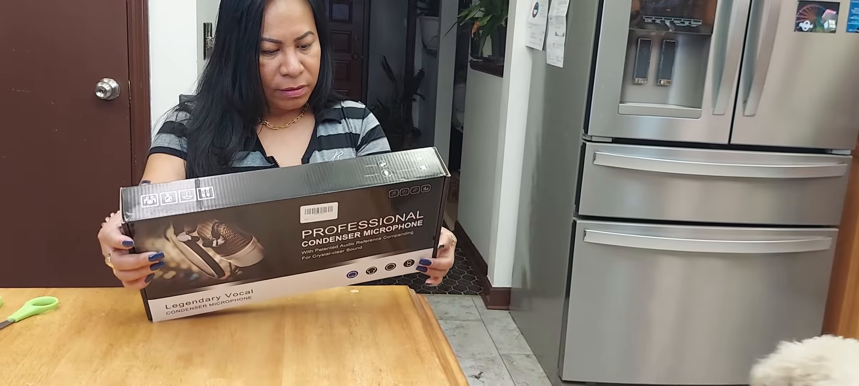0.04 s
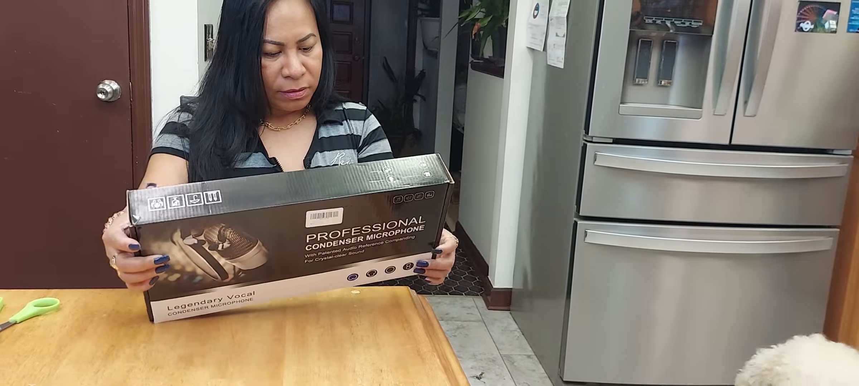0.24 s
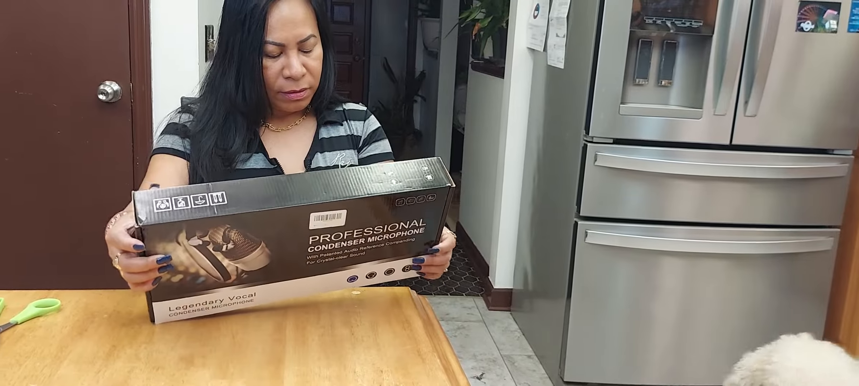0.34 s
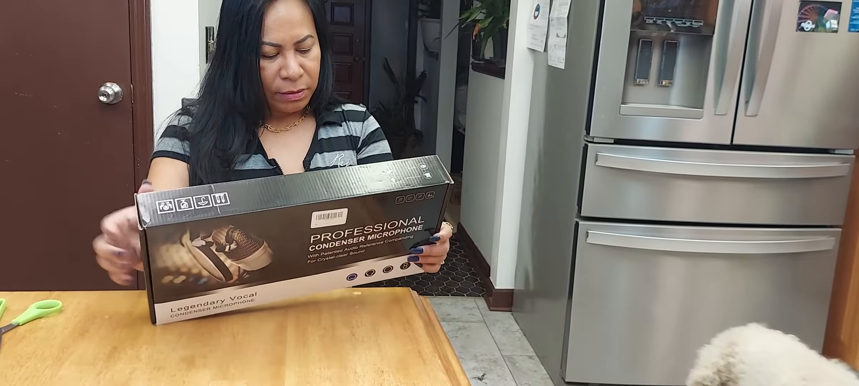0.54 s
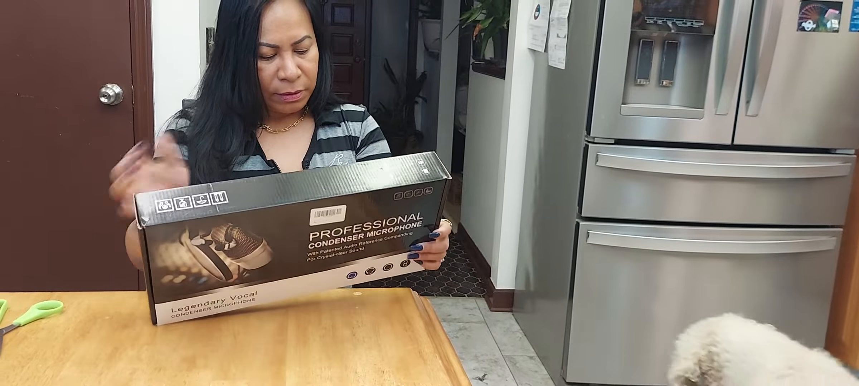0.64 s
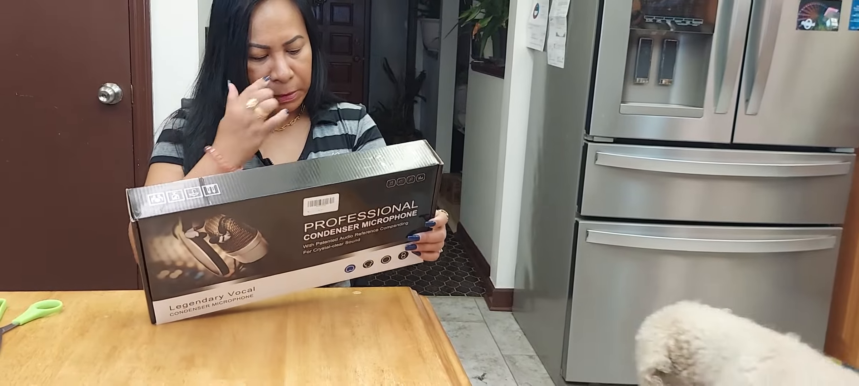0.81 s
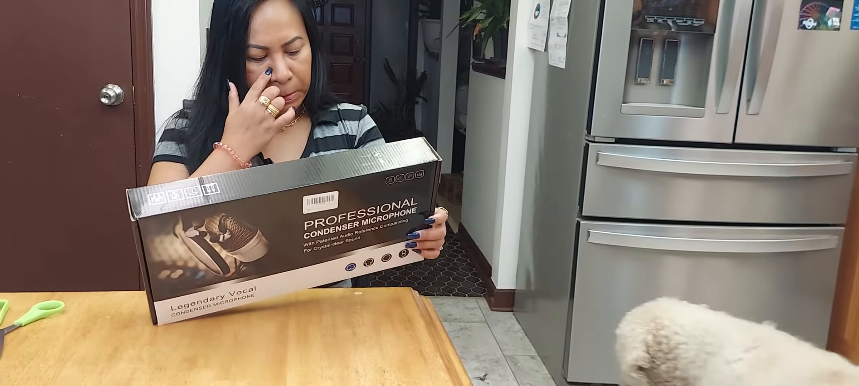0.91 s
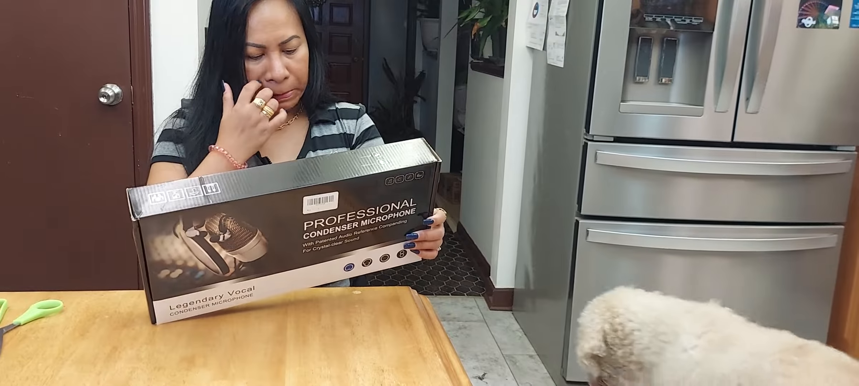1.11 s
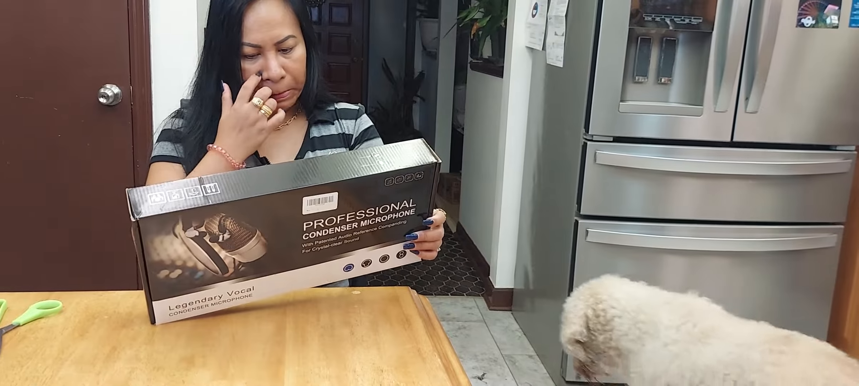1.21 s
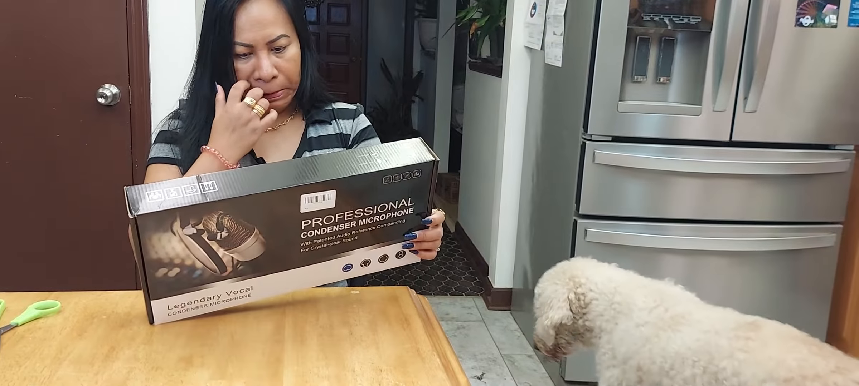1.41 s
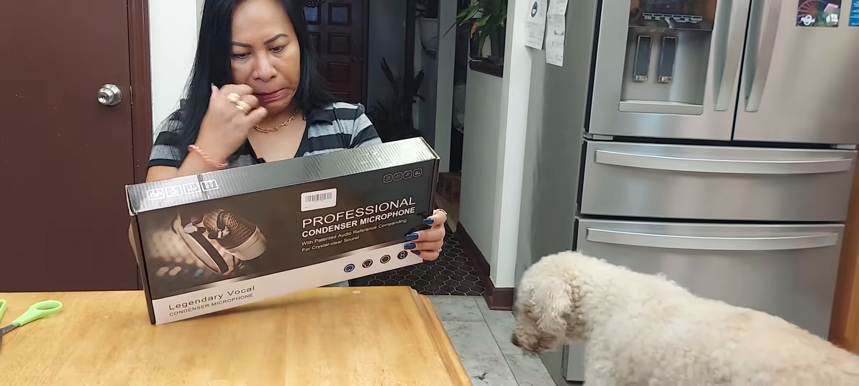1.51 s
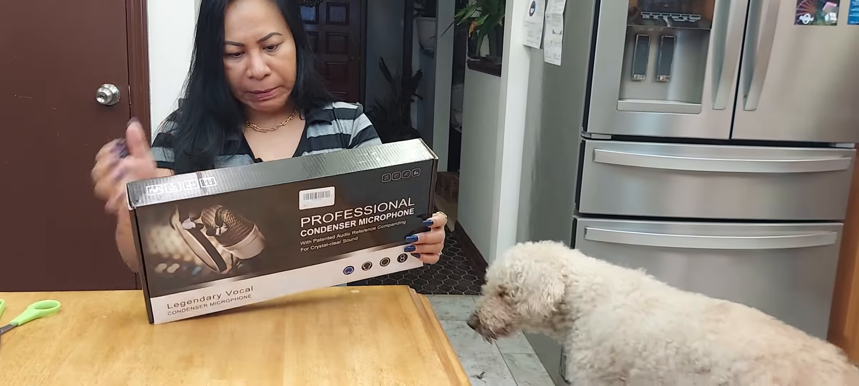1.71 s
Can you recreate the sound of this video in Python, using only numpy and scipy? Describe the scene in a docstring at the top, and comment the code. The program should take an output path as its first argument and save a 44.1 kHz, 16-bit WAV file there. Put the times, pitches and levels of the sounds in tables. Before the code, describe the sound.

Fingers knock, slide and click on a hollow cardboard box, which crackles briefly.

```python
"""A long cardboard box is handled at a kitchen table; low hum and faint hiss, the hard room rings.
0-0.5 s: a crackle's tail dies; fingertips knock, slide and squeak, nails click, the box rocks and thumps.
0.8-1.2 s: more squeaks and knocks on the hollow shell, a cluster of nail clicks, then a soft scuff.
1.4 s: the card gives way in one quick crackle of creases that ring its panels.
1.6-1.75 s: a last squeak, two knocks, a faint click and a slide as the grip shifts."""
import sys
import numpy as np
from scipy import signal
from scipy.fft import rfft, irfft, next_fast_len
from scipy.io import wavfile
from scipy.ndimage import map_coordinates

SR = 44100
rng = np.random.default_rng(int(sys.argv[2]) if len(sys.argv) > 2 else 0)


def generate_wav(signal):
    """Clip the signal to [-1, 1] and save it as 16-bit WAV at the path in sys.argv[1]."""
    frames = np.transpose(np.atleast_2d(signal))
    scaled = np.clip(frames, -1, 1) * 32767
    pcm = np.round(scaled).astype(np.int16)
    wavfile.write(sys.argv[1], SR, pcm)


N = 77175
T = np.arange(N) / SR

# room decay: f/Hz, T60/s
ROOM_DECAY = [(100, 0.3), (500, 0.32), (1600, 0.37), (4000, 0.42), (8000, 0.32), (14000, 0.35)]
# diffuse field: f/Hz, left-right correlation/1
COHERENCE = [(60, 0.88), (200, 0.51), (600, 0.7), (1000, 0.071), (16000, 0)]
# room colour, shading of the left channel, resonance of the right: f/Hz, gain/dB
ROOM_EQ = [(100, 4), (1500, 1.5), (4000, 5), (8200, 1), (9200, -7), (13000, -9.5), (16000, -5)]
LEFT_EQ = [(200, -1.5), (8000, -5.5), (11000, -8.5), (13500, -3), (16000, -14.5)]
RIGHT_EQ = [(100, -3), (500, -0.5), (3000, -1.5), (8000, 0.5), (11000, 5), (13500, 9), (16000, 7)]
# spectra: f/Hz, level/dB
BACKGROUND_SPECTRUM = [(20, -16.5), (45, -1), (72, 11.5), (120, 3), (220, -6.5), (450, -2.5), (700, -25),
                       (1330, -18.5), (1515, -1), (1760, -16), (6000, -29), (7800, -19), (9500, -29),
                       (15000, -24.5)]
GRIP_SPECTRUM = [(50, -20), (150, -5.5), (350, -1.5), (520, 1.5), (720, -4.5), (1000, -20.5), (1500, -11.5),
                 (2300, -32), (16000, -43.5)]
SLIDE_SPECTRUM = [(200, -12.5), (1500, 1.5), (3000, -7.5), (8000, -1.5), (10000, -7), (15500, 1)]
SCUFF_SPECTRUM = [(200, -2), (800, -2.5), (1100, -8), (1600, 7), (3000, -1.5), (5000, -8.5), (8000, -13),
                  (10000, -27), (16000, -17)]
SHELL_SPECTRUM = [(50, -25), (150, -10), (300, 1), (640, 0.5), (800, -3), (1050, -9), (1500, 2.5),
                  (2200, -23.5), (16000, -50)]
CARD_SPECTRUM = [(60, -39.5), (300, -19), (760, -13), (1250, -10), (1600, -1.5), (3000, -6.5), (5000, -6),
                 (7600, 0.5), (9500, -1), (12500, -3.5), (16000, -15.5)]
NAIL_SPECTRUM = [(60, -39), (250, -20), (700, -11), (1000, -9.5), (1600, 1), (2800, -7.5), (5000, -4.5),
                 (7800, 2), (9500, -1), (13000, -0.5), (16000, -9.5)]
# palms pressing on the shell: t/s, level/dB
GRIP_LEVELS = [(0, -65), (.1, -59), (.18, -61.5), (.3, -54.5), (.43, -66), (.52, -66), (.6, -71),
               (1.1, -75), (1.22, -76), (1.33, -79.5), (1.62, -81), (1.75, -57.5)]
# skin sliding on glossy print, fingers scuffing card: peak t/s, level/dB, rise/s, fall/s
SKIN_SLIDES = [(.215, -60, 0.036, 0.057), (.492, -55, 0.071, 0.043), (1.19, -70.5, .08, 0.094),
               (1.75, -58.5, 0.017, 0.033)]
CARD_SCUFFS = [(1.17, -62, 0.042, 0.045), (1.745, -64.5, 0.011, 0.056)]
# fingertip stick-slip: t/s, level/dB, rise/s, f/Hz
FINGER_SQUEAKS = [(.478, -63, .012, 650), (.786, -69.5, .016, 930), (.79, -69, .011, 725),
                  (1.16, -73, .036, 410), (1.635, -61.5, .004, 1400)]
# box rocking in the grip: t/s, level/dB
BOX_THUMPS = [(0.238, -53.5), (.266, -48)]
# lowest box modes: f/Hz, gain/dB, T60/s
BOX_MODES = [(79.4, -4.5, 0.28), (200.3, 6, 0.14)]
# fingertip knocks: t/s, level/dB, brightness/dB, spot f/Hz
FINGER_KNOCKS = [(0.096, -15.5, -21, 380), (.209, -16, -6.5, 505), (.236, -11, 2, 509),
                 (.362, -12, -6.5, 448), (.482, -18.5, -2.5, 648), (0.822, -23.5, -8, 529),
                 (.851, -22, 3.5, 328), (1.636, -30, 2.5, 1380), (1.710, -22, -12, 450)]
# card panel resonances: f/Hz, width/Hz, lift/dB
PANEL_MODES = [(770, 27, 9.5), (1105, 25, 11.5), (1894, 22, 7.5), (2420, 32, 5.5), (2954, 23, 9)]
# creases: t/s, level/dB re SNAP_DB, top/dB, middle/dB
CARD_CREASES = [(1.4073, -14.5, 1.5, 3.5), (1.4107, -15, 3, 0.5), (1.415, -9, -13.5, -4),
                (1.4178, -10, -14, 2.5), (1.4221, -15, -7, 11.5), (1.4300, -12, -15, -4.5)]
# crackle still ringing at the start: lead t/s, level/dB re SNAP_DB, top/dB, middle/dB
OPENING_CRACKLE = (.05, -6, -8, 10)
# fingernail clicks; the one at 0.882 s is a wall echo of the click just before:
# t/s, level/dB re SNAP_DB, top/dB, middle/dB, room/dB
CLICKS_AND_ECHO = [(0.2315, -2, 8.5, -7, 3), (0.235, 0.5, 7, -2, -0.5), (.2370, -2, -2.5, -0.5, 6.5),
                   (0.8674, -37, 11, -10, 11), (0.8756, -7, -1.5, -6, 7.5), (0.8773, -5.5, 1.5, -3.5, 6),
                   (0.882, -12, -10, -9, 0), (0.9415, -1.5, -1.5, -5, -1.5), (1.0068, -21, -9, 7, 0.5),
                   (1.7114, -34, -7, 15.5, -2.5)]

ROOM_BUILD_S, WALL_S, WALL_DB = 0.0024, 0.008, -13
LEFT_DELAY_S, CUTOFF_HZ = 0.00015, 15800
BACKGROUND_DB, GRAIN_DB = -69, 1.5
SQUEAK_SAG_PER_S, SQUEAK_ROUGHNESS, SQUEAK_ROOM_DB = 0.69, 0.65, -10
THUMP_ATTACK_S = 0.0056
KNOCK_T60_S, KNOCK_ROOM_DB, SPOT_DB, SPOT_Q = 0.022, 1, 8, 12
SNAP_DB, SNAP_SIGMA_S, CREASE_ROOM_DB = -6, 0.00028, 9


def amp(db):
    """dB to gain."""
    return 10 ** (np.asarray(db) / 20)


def unit_rms(x):
    """Scale to rms 1."""
    return x / np.sqrt(np.mean(x ** 2) + 1e-20)


def along(points, hz):
    """Interpolate (f/Hz, value) points on a log axis."""
    f, v = np.transpose(points)
    return np.interp(np.log(hz + 1), np.log(f + 1), v)


def eq(points):
    """(f/Hz, gain/dB) points to a frequency response."""
    return lambda hz: amp(along(points, hz))


def filtered(x, response):
    """Apply response(hz) by FFT."""
    size = next_fast_len(x.shape[-1] + SR // 4)
    return irfft(rfft(x, size) * response(np.fft.rfftfreq(size, 1 / SR)), size)[..., :x.shape[-1]]


def add(out, at_s, x):
    """Mix x into out from at_s."""
    i = int(round(at_s * SR))
    x = x[:, max(-i, 0):N - i]
    out[:, max(i, 0):max(i, 0) + x.shape[1]] += x


def wobble(knots_per_s):
    """Smooth random curve."""
    return map_coordinates(rng.standard_normal(2048), [T * knots_per_s], mode="wrap")


def burst(envelope):
    """Short random impulse, flat spectrum."""
    spectrum = rfft(rng.standard_normal(len(envelope)) * envelope)
    return irfft(spectrum / (abs(spectrum) + 1e-9))


def diffuse(size):
    """Stereo white noise, correlated in the bass only."""
    def mid_side_gains(hz):
        angle = np.arccos(along(COHERENCE, hz)) / 2
        return np.array([np.cos(angle), np.sin(angle)])
    mid, side = filtered(rng.standard_normal((2, size)), mid_side_gains)
    return np.array([mid + side, mid - side])


def noise(spectrum):
    """Coloured stereo noise, rms 1."""
    return unit_rms(filtered(diffuse(N), eq(spectrum)))


def room(t60_scale=1):
    """Fresh room tail; each frequency decays at its own rate."""
    hz, t, bins = signal.stft(diffuse(SR * 3 // 4), SR, nperseg=256)
    t60_s = t60_scale * along(ROOM_DECAY, hz)[:, None]
    tail = signal.istft(bins * amp(-60 * t / t60_s), SR, nperseg=256)[1]
    tail *= 1 - np.exp(-T[:tail.shape[1]] / ROOM_BUILD_S)
    return filtered(tail / np.linalg.norm(tail[0]), eq(ROOM_EQ))


def contact(at_s, force, response, room_db, tail):
    """One contact: direct sound from the right, a wall reflection, then the room."""
    lead = SR // 100
    start_s = at_s - lead / SR
    right = filtered(np.pad(force / np.linalg.norm(force), (lead, SR // 10)), response)
    left = filtered(right, lambda hz: amp(along(LEFT_EQ, hz)) * np.exp(-2j * np.pi * hz * LEFT_DELAY_S))
    direct = np.array([left, right])
    out = np.zeros((2, N))
    add(out, start_s, direct)
    add(out, start_s + WALL_S, amp(WALL_DB) * direct)
    add(out, start_s, amp(room_db) * signal.fftconvolve(right[None], tail, axes=1))
    return out


def background():
    """Steady low hum and faint hiss, with a narrow microphone ring near 1.5 kHz."""
    return amp(BACKGROUND_DB) * noise(BACKGROUND_SPECTRUM)


def grip():
    """Palms creep on the box and murmur in its shell."""
    return amp(np.interp(T, *np.transpose(GRIP_LEVELS))) * noise(GRIP_SPECTRUM)


def strokes(rows, spectrum):
    """Grainy friction; swells and fades 10 dB per rise and fall time."""
    envelope = sum(amp(db - 10 * np.maximum((peak_s - T) / rise_s, (T - peak_s) / fall_s))
                   for peak_s, db, rise_s, fall_s in rows)
    return envelope * unit_rms(noise(spectrum) * amp(GRAIN_DB * wobble(knots_per_s=300)))


def squeaks():
    """Skin chatters on the print: a rough tone that sinks as the finger slows."""
    out = np.zeros(N)
    for at_s, db, rise_s, hz in FINGER_SQUEAKS:
        t = np.maximum(T - at_s, 0)
        flutter = SQUEAK_ROUGHNESS * wobble(knots_per_s=150)
        slip_rad = SQUEAK_ROUGHNESS * wobble(knots_per_s=150)
        phase = 2 * np.pi * np.cumsum(hz * np.exp(-SQUEAK_SAG_PER_S * t)) / SR
        envelope = amp(db) * t / rise_s * np.exp(1 - t / rise_s)
        out += envelope * (1 + flutter) * np.sin(phase + slip_rad)
    return out + amp(SQUEAK_ROOM_DB) * signal.fftconvolve(out[None], room(), axes=1)[:, :N]


def thumps():
    """The lowest box modes swell and die as it rocks."""
    out = np.zeros(N)
    for at_s, db in BOX_THUMPS:
        t = np.maximum(T - at_s, 0)
        attack = 1 - np.exp(-t / THUMP_ATTACK_S)
        for hz, mode_db, t60_s in BOX_MODES:
            out += attack * amp(db + mode_db - 60 * t / t60_s) * np.sin(2 * np.pi * hz * t)
    return out


def knocks():
    """Fingertips land softly on the hollow shell; each spot has its own pitch."""
    t = T[:SR // 10]
    out = np.zeros((2, N))
    for at_s, db, bright_db, spot_hz in FINGER_KNOCKS:
        force = burst(amp(-60 * t / KNOCK_T60_S))[:len(t) // 2]
        spot_ring = signal.lfilter(*signal.iirpeak(spot_hz, SPOT_Q, SR), force)
        force += (amp(SPOT_DB) - 1) * spot_ring
        tilt = [(600, 0), (1600, bright_db)]
        response = lambda hz: amp(db + along(SHELL_SPECTRUM, hz) + along(tilt, hz))
        out += contact(at_s, force, response, KNOCK_ROOM_DB, room())
    return out


def snap(at_s, db, top_db, middle_db, room_db, body, tail):
    """Broadband crack of about 1 ms, coloured by the body that makes it."""
    t = T[:256] - T[128]
    envelope = np.exp(-0.5 * (t / SNAP_SIGMA_S) ** 2)
    force = burst(envelope) * np.sqrt(envelope)
    tilt = [(2000, middle_db), (5000, 0), (8000, 0), (12000, top_db)]
    response = lambda hz: amp(SNAP_DB + db + along(tilt, hz)) * body(hz)
    return contact(at_s + t[0], force, response, room_db, tail)


def panel(hz):
    """Card response with its hollow resonances."""
    ring = sum((amp(db) - 1) * 1j * hz * width_hz / (mode_hz ** 2 - hz ** 2 + 1j * hz * width_hz)
               for mode_hz, width_hz, db in PANEL_MODES)
    return amp(along(CARD_SPECTRUM, hz)) * (1 + ring)


def crackle():
    """Card gives way in a run of creases; a snap before t = 0 leaves only its room tail."""
    creases = sum(snap(*row, CREASE_ROOM_DB, panel, room(t60_scale=0.88)) for row in CARD_CREASES)
    lead_s, *levels_db = OPENING_CRACKLE
    return creases + snap(-lead_s, *levels_db, room_db=0, body=eq(CARD_SPECTRUM), tail=room())


def nails(shared_power=0.6):
    """Hard, bright fingernail clicks and one wall echo; nearby spots share part of their room tail."""
    shared_tail = np.sqrt(shared_power) * room()
    return sum(snap(*row, eq(NAIL_SPECTRUM), shared_tail + np.sqrt(1 - shared_power) * room())
               for row in CLICKS_AND_ECHO)


def scene():
    """Box handling over the steady background."""
    friction = grip() + squeaks()
    friction += strokes(SKIN_SLIDES, SLIDE_SPECTRUM) + strokes(CARD_SCUFFS, SCUFF_SPECTRUM)
    return nails() + crackle() + knocks() + thumps() + friction + background()


def record(dry):
    """Top-octave lift on the right, steep low-pass on both channels."""
    stereo = np.array([dry[0], filtered(dry[1], eq(RIGHT_EQ))])
    return filtered(stereo, lambda hz: 1 / np.sqrt(1 + (hz / CUTOFF_HZ) ** 220))


dry = scene()
out = record(dry)
generate_wav(out)
```